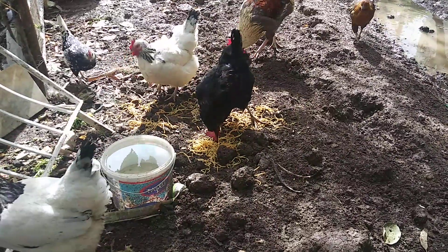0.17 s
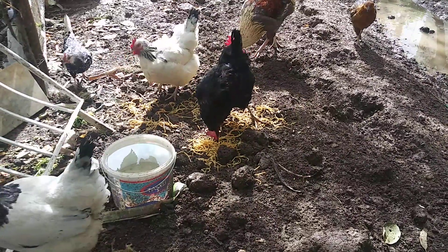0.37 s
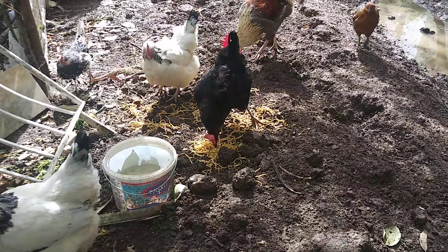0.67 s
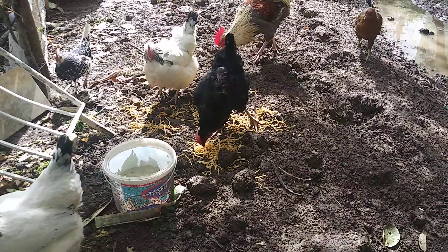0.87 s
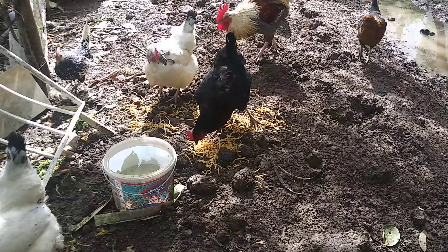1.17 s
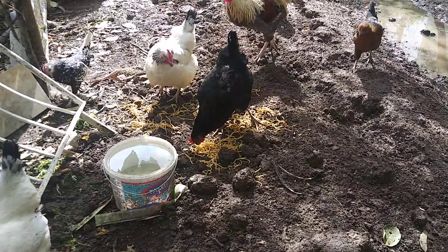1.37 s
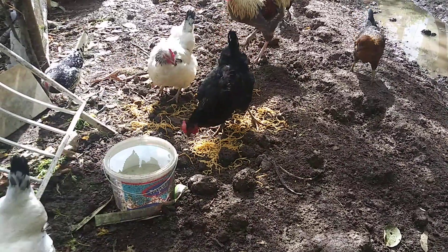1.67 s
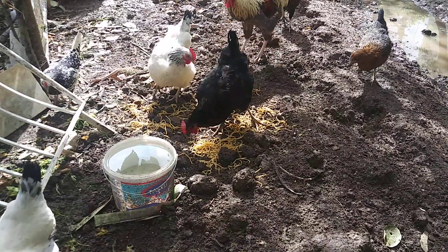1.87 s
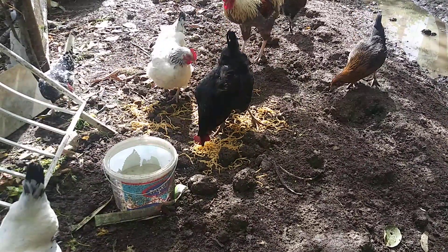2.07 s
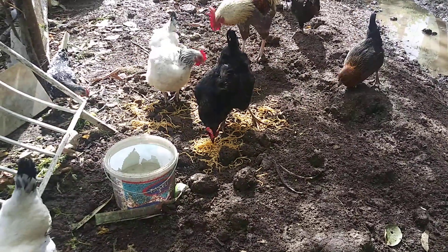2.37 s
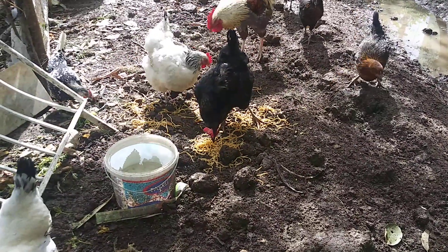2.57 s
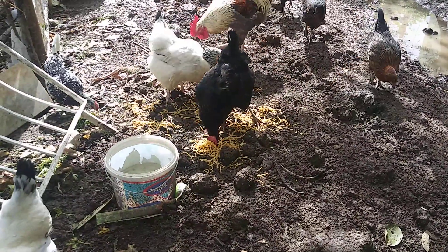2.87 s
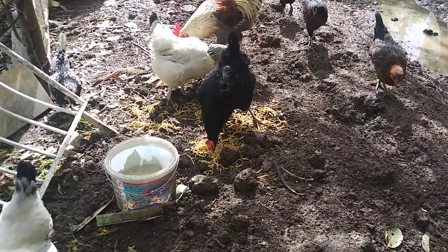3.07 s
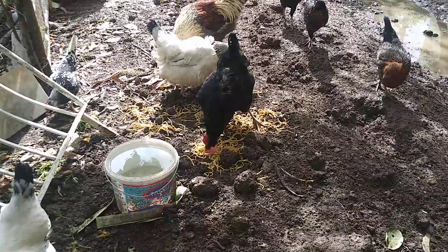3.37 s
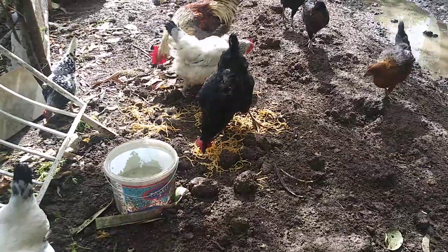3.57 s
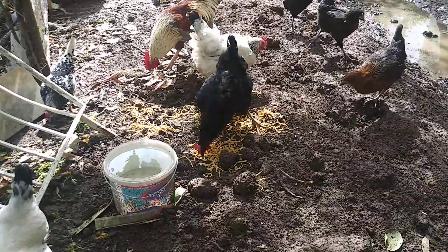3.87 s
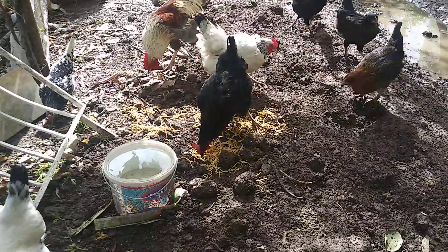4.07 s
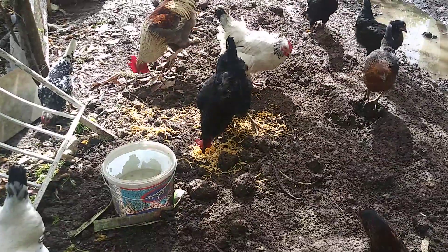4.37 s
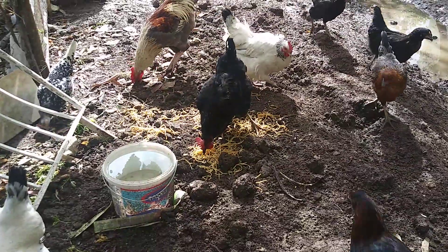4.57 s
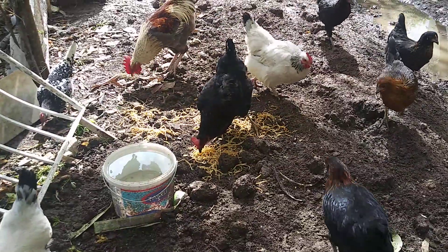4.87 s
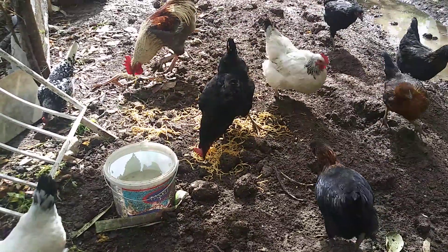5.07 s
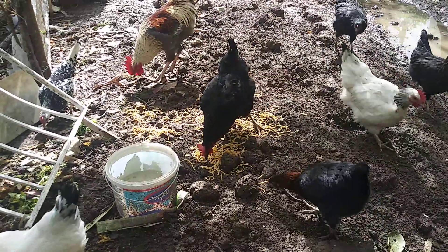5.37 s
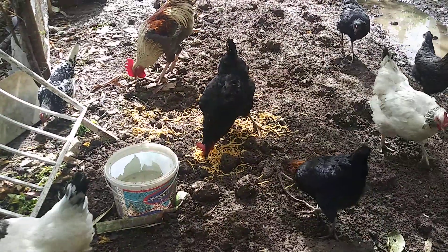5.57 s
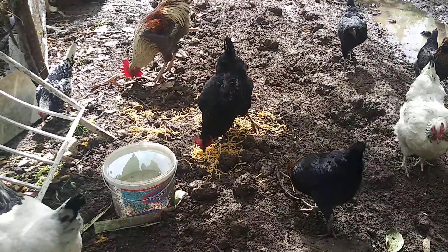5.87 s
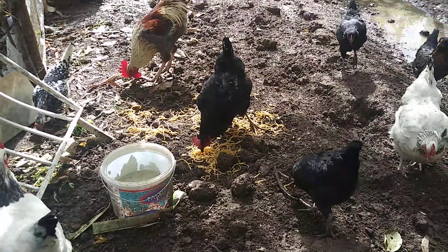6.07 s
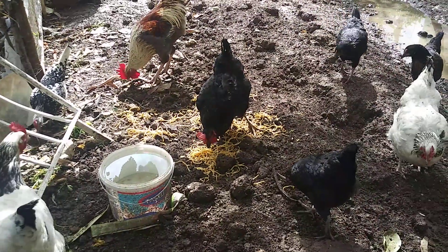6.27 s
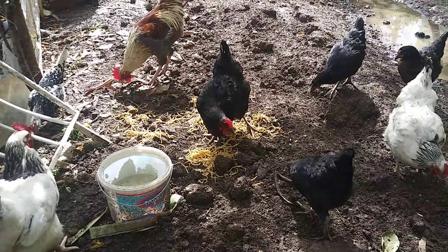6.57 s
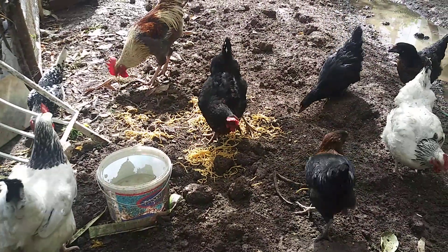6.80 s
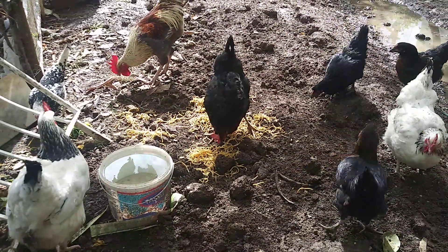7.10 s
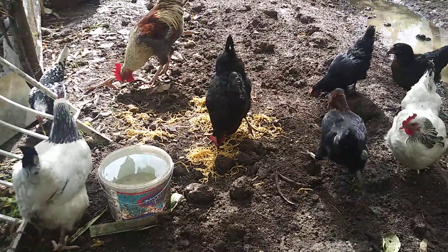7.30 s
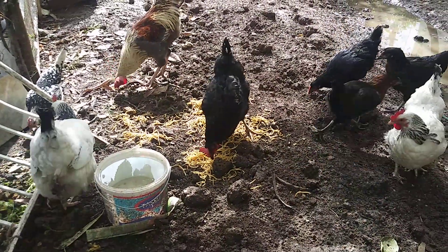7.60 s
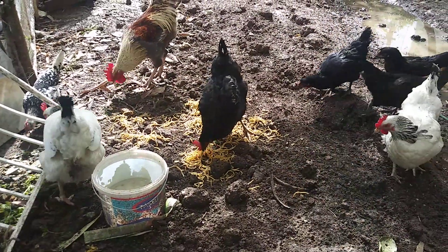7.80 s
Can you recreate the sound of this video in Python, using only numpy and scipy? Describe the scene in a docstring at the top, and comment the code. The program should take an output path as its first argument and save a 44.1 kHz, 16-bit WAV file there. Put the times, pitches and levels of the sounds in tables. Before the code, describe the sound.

Chickens feed in a yard. At first, distant hens murmur softly, beaks tick on grit, and feet and feathers scuff, while young birds give short, high peeps that ring off nearby walls. About halfway through, a hen near the microphone cackles loudly, then lets out a wail that turns rough and breaks, and clucks twice. A few peeps and pecks remain over a soft outdoor hush and a faint low drone.

```python
"""Hens feed in a muddy yard, over an outdoor hush and a faint low drone. From the start, beaks tick on
grit, feet and feathers scuff, far hens murmur and young birds peep in whistles that ring off the walls.
At 3.5 s a near hen cackles, her syrinx buzzing through throat resonances and flipping up in register.
At 5 s she wails; the wail turns rough in its second half and breaks at the end. She clucks twice.
After 6 s a few peeps, pecks and a thin twitter remain."""
import sys
import numpy as np
from scipy import signal
from scipy.fft import rfft, irfft
from scipy.io import wavfile

SR = 44100
rng = np.random.default_rng(int(sys.argv[2]) if len(sys.argv) > 2 else 0)


def pcm_store(signal):
    """Save signal as 16-bit PCM."""
    levels = np.round(np.clip(np.atleast_2d(signal), -1, 1) * 32767)
    wavfile.write(sys.argv[1], SR, levels.astype(np.int16).T)


N = 350154
T = np.arange(N) / SR

# outdoor air spectrum: freq_hz, gain_db
HUSH_SPECTRUM = [(25, -42), (48, -5), (95, -9.5), (195, -7.5), (300, -13), (700, -14), (1700, -16),
                 (2600, -23), (4200, -27), (6000, -38.5), (7900, -41.5), (10000, -39.5), (12500, -46.5),
                 (15500, -47)]
# outdoor air contour: time_s, level_db
HUSH_CURVE = [(0, -46.5), (.9, -47.5), (1.75, -47.5), (2.9, -49.5), (4.5, -52), (6.4, -52), (7.94, -53)]
# upper and lower drone tones: time_s, pitch_hz, level_db
DRONE_UPPER = [(0.0, 164.0, -38), (0.67, 166.4, -57), (2.08, 158.3, -57.5), (4.45, 156.1, -54),
               (4.54, 165.0, -50), (5.97, 149.4, -50), (7.8, 157.5, -42.5)]
DRONE_LOWER = [(0.0, 80.0, -52), (3.19, 86, -53), (3.43, 92.2, -54), (7.06, 95.2, -51), (7.21, 82.6, -56),
               (7.8, 90, -52)]
# boom under the drone: time_s, level_db
BOOM_CURVE = [(0.0, -58), (0.65, -49), (2.06, -59), (2.11, -66), (3.04, -45), (3.65, -62), (3.69, -53),
              (5.63, -68), (7.8, -56)]
# soft thuds: start_s, length_s, level_db
THUD_EVENTS = [(2.433, 0.19, -40), (3.678, 0.11, -39)]

# peck, scuff and crackle spectrum: freq_hz, gain_db
GRIT_SPECTRUM = [(500, -25), (2000, 7), (4000, 7), (6000, 8), (8000, -2), (10000, 9), (12500, -13.5),
                 (16000, -15)]
# beak strikes: start_s, level_db, decay_s
PECK_EVENTS = [(.088, -38.5, 0.0015), (0.269, -35, 0.0028), (0.318, -38, 0.0014), (0.495, -45, 0.0032),
               (.642, -42, .002), (0.672, -35, 0.0034), (1.997, -42, 0.0035), (2.056, -37, 0.0019),
               (2.086, -36, 0.0022), (4.316, -32.5, 0.0057), (4.533, -48, 0.0023), (5.294, -40, .003),
               (5.483, -45, .005), (6.501, -44.5, 0.0052), (7.486, -43.5, 0.0021)]
# foot and feather strokes: start_s, length_s, level_db, tilt_db_per_octave
SCUFF_EVENTS = [(0.217, 0.059, -33.5, 1.5), (1.593, 0.077, -40, -2.5), (1.653, 0.098, -37, -1),
                (1.763, 0.13, -38.5, -0.5), (1.974, 0.079, -37, 14), (4.612, 0.043, -46, 5)]
# far hens: start_s, length_s, first_hz, last_hz, level_db, throat_hz
MURMUR_NOTES = [ (0, 0.1, 603, 596, -41, 950), (0.11, 0.055, 328.3, 308.5, -29.5, 880),
                (0.249, 0.079, 516, 550.4, -26, 970), (0.468, 0.049, 273, 281, -37, 620),
                (0.592, 0.18, 288, 268, -40, 616), (0.758, 0.1, 442, 493, -39.5, 685),
                (0.94, 0.048, 651, 520, -37, 613), (1.005, 0.061, 644, 504, -39, 583),
                (2.215, 0.037, 465, 406, -39.5, 500), (2.298, 0.049, 238, 265, -39.5, 650),
                (2.451, 0.059, 270.5, 308, -36.5, 674), (2.543, 0.161, 268, 307.7, -38, 660),
                (2.69, 0.15, 452.5, 498, -39.5, 664), (2.91, 0.035, 647, 473, -35, 590),
                (3.089, .05, 465, 586, -46, 1090), (3.154, 0.056, 451, 426, -37, 500),
                (3.893, 0.046, 485, 514, -28, 1000)]
# very high whistles: start_s, length_s, pitch_hz, level_db
TWITTER_NOTES = [(1.243, 0.34, 10100, -59), (6.66, 0.36, 10430, -56.5)]

# airy top of a peep: freq_hz, gain_db
PEEP_SPECTRUM = [(2500, -10.5), (4500, -1), (6200, -6), (7800, -22), (9700, -3), (11500, -14.5),
                 (15500, -24)]
# two-note peeps: start_s, level_db
TWO_NOTE_EVENTS = [(0.378, -32.5), (1.499, -30), (2.425, -30.5), (2.969, -56), (3.82, -26.5), (4.867, -32),
                   (6.031, -33.5)]
# their shared tune: offset_s, pitch_hz, level_db
TWO_NOTE_CURVE = [(0, 3800, -5.5), (.03, 4730, 2), (.055, 4020, -1.5), (.075, 3600, -8.5),
                  (.096, 3760, 9.5), (.118, 3620, -24)]
# sliding peeps: start_s, length_s, top_hz, end_hz, level_db, nearness (0-1)
SLIDE_EVENTS = [(0.64, 0.041, 4160, 3910, -35, 0), (1.091, 0.13, 5225, 2878, -27.5, 0.27),
                (2.164, .082, 4450, 3036, -27.5, .25), (3.22, 0.093, 4470, 3055, -28.5, 0.29),
                (3.494, 0.12, 5145, 2750, -28.5, 0), (4.509, 0.097, 4480, 3540, -55, 0),
                (4.968, 0.11, 5046, 3100, -29, 0.12), (5.084, .089, 5860, 2980, -35, 1),
                (7.145, 0.15, 5113, 3100, -28.5, 0), (7.649, .082, 4820, 3200, -43, 0),
                (7.92, .09, 5680, 3400, -39, 1)]
# their shared hook and fall: length_share, pitch_range_share, level_db
SLIDE_CURVE = [(0, .45, 4), (.19, .98, -3.5), (.4, .62, 0), (.72, 0.27, 0), (1, 0, -4)]

# near hen's upper throat resonances: freq_hz, gain_db
THROAT_SPECTRUM = [(2100, -22.5), (2700, -19), (3350, -22.5), (3850, -10), (4300, -21.5), (4900, -40.5),
                   (6200, -32), (7900, -42.5), (9600, -30), (12000, -44)]
# noise of a breaking voice: freq_hz, gain_db
HOARSE_SPECTRUM = [(300, -24), (700, 4.5), (1200, -9), (2000, -8), (4000, -22), (7000, -31)]
# long calls: time_s, pitch_hz, level_db (harmonic 2), edge_db (harmonic 3 re 2)
CACKLE_CURVE = [(3.538, 550, -35, -15), (3.6, 544.4, -22.5, -28), (3.68, 595.3, -22, -22),
                (3.715, 544.6, -15, -23), (3.775, 533.3, -13.5, -11.5), (3.815, 535.4, -21.5, -18.5),
                (3.87, 539.3, -14.5, -10), (3.95, 572.4, -10.5, -15.5), (4.03, 630.5, -12.5, -27),
                (4.11, 578, -9, -9.5), (4.18, 630, -25, -24)]
WAIL_CURVE = [(4.955, 538, -28.5, -35), (5.035, 594, -17, -11.5), (5.07, 570.3, -24, -25),
              (5.21, 612, -16.5, -22), (5.252, 579, -20, -18), (5.335, 634.3, -8, -24.5),
              (5.385, 634, -7.5, -23), (5.425, 600.6, -13, -19.5), (5.47, 612.8, -9.5, -15.5),
              (5.52, 576.5, -25.5, -4.5), (5.6, 564.8, -19.5, -14), (5.67, 554, -23.5, -25.5),
              (5.703, 570, -46, -21)]
# flips into a thin, higher register: start_s, length_s, rise_hz, dip_db
REGISTER_FLIPS = [(3.717, 0.056, 115, -14), (3.884, 0.066, 175, -29.5), (3.956, 0.061, 162.3, -21),
                  (4.037, 0.076, 138, -22), (4.117, .085, 93.6, -13.5), (5.036, .054, 69.5, 0),
                  (5.099, 0.046, 51.3, 1.5), (5.612, 0.095, 81.7, 2.5)]
# clucks: start_s, length_s, pitch_hz, peak_db, edge_db
CLUCK_NOTES = [(5.775, 0.084, 557, -15, -15.5), (5.955, 0.0773, 574, -16.5, -16)]
# lift of harmonics 4 and up: call name -> lift_db
LIFT_DB = {"cackle": 1, "wail": 2.5, "cluck": 3.5}

BODY_DB, BODY_SHARE = -21.5, .21  # fundamental: base level, share of level_db it follows
CLEAR_ROUGH, LATE_ROUGH, BROKEN_ROUGH = .015, .045, .65


def undb(db):
    """Decibels to gain."""
    return 10 ** (np.asarray(db) / 20)


def unit(x):
    """Scale to rms 1."""
    return x / np.sqrt(np.mean(x ** 2) + 1e-20)


def span(length_s):
    """Time axis, 5 ms or more."""
    return np.arange(int(max(length_s, .005) * SR)) / SR


def add(out, start_s, x):
    """Mix x into out at start_s."""
    i = int(max(start_s, 0) * SR)
    out[i:i + len(x)] += x[:max(len(out) - i, 0)]


def read(curve, t):
    """Interpolate a curve's columns at t."""
    times, *columns = np.transpose(curve)
    return [np.interp(t, times, column) for column in columns]


def shape_db(hz, spectrum):
    """Interpolate a spectrum over log frequency."""
    freq_hz, db = np.transpose(spectrum)
    return np.interp(np.log(hz + 1e-9), np.log(freq_hz), db)


def noise(n, spectrum, tilt_db=0):
    """Coloured noise, rms 1; tilt_db per octave above 1 kHz."""
    hz = np.maximum(np.arange(n // 2 + 1) * SR / n, 1)
    slope_db = tilt_db * np.log2(np.maximum(hz, 1000) / 1000)
    return unit(irfft(rfft(rng.standard_normal(n)) * undb(shape_db(hz, spectrum) + slope_db), n))


def walk(t, rate_hz):
    """Random drift between Gaussian knots."""
    knots = rng.standard_normal(int(t[-1] * rate_hz) + 2)
    return np.interp(t * rate_hz, np.arange(len(knots)), knots)


def gate(t, rise_s, fall_s):
    """Smooth onset and release."""
    return np.sin(np.pi / 2 * np.clip(np.minimum(t / rise_s, (t[-1] - t) / fall_s), 0, 1)) ** 2


def phase_rad(hz):
    """Running phase of a pitch curve."""
    return 2 * np.pi * np.cumsum(hz) / SR


def echo(x, delay_s, db):
    """x plus one wall reflection."""
    return x + undb(db) * np.interp(T - delay_s, T, x, left=0)


def yard(x, early_s, late_s, late_db):
    """Scatter from ground and walls: dense burst, weak longer tail."""
    t = span(.87)
    decay = np.exp(-t / early_s) + undb(late_db) * np.exp(-t / late_s)
    response = rng.standard_normal(len(t)) * decay * gate(t, .00066, .16)
    return signal.fftconvolve(x, response / np.linalg.norm(response))[:N]


def hush():
    """Outdoor air, high hiss and the crackle of many feet on litter."""
    air_db, = read(HUSH_CURVE, T)
    air = noise(N, HUSH_SPECTRUM) * undb(air_db + 7 + .5 * walk(T, 10))
    hiss = noise(N, [(7500, -57), (9000, -5), (10200, -4), (11200, -9.5), (13000, -45)])
    hiss *= undb(-66.5 + 1.9 * walk(T, 14))
    crackle = noise(N, GRIT_SPECTRUM) * undb(-72 + np.minimum(6 * walk(T, 260), 16))
    return air + hiss + crackle


def drone(boom_hz=54.6):
    """Two far, wavering tones over a boom."""
    out = np.zeros(N)
    tones = [(*read(DRONE_UPPER, T), -1.5), (*read(DRONE_LOWER, T), -1),
             (boom_hz, *read(BOOM_CURVE, T), 2)]
    for hz, db, trim_db in tones:
        gain = undb(db + trim_db + 2 * walk(T, 7.4))
        out += gain * np.sin(phase_rad(hz * (1 + .01203 * walk(T, 16))))
    return out


def thuds():
    """Dull noise bursts near 100 Hz."""
    out = np.zeros(N)
    for start_s, length_s, db in THUD_EVENTS:
        t = span(length_s)
        body = noise(len(t), [(40, -15), (100, -.5), (180, -13.5), (400, -19.5), (2000, -56)])
        add(out, start_s, undb(db) * body * gate(t, .019, .44 * length_s))
    return out


def foraging():
    """Beaks tick on grit; feet and feathers brush it in grainy strokes."""
    out = np.zeros(N)
    for start_s, db, decay_s in PECK_EVENTS:
        t = span(.047)
        add(out, start_s, undb(db) * noise(len(t), GRIT_SPECTRUM, tilt_db=8) * np.exp(-t / decay_s))
    for start_s, length_s, db, tilt_db in SCUFF_EVENTS:
        t = span(length_s)
        grain = undb(walk(t, 700))
        stroke = noise(len(t), GRIT_SPECTRUM, tilt_db) * grain
        add(out, start_s, undb(db) * stroke * gate(t, .034, .91 * length_s))
    return out + undb(-8) * yard(out, early_s=.018, late_s=.08, late_db=-15)


def murmurs(throat_q=4.5):
    """Far hens: soft, hoarse notes through one throat resonance."""
    out = np.zeros(N)
    harmonic = np.arange(1, 6)[:, None]
    for start_s, length_s, first_hz, last_hz, db, throat_hz in MURMUR_NOTES:
        t = span(length_s)
        hz = np.linspace(first_hz, last_hz, len(t)) * (1 + .02 * walk(t, 170))
        ratio = harmonic * hz / throat_hz
        gains = 1 / np.hypot(1, throat_q * (ratio - 1 / ratio)) / harmonic ** .8
        note = unit(np.sum(gains * np.sin(harmonic * phase_rad(hz)), axis=0))
        hoarse = 1 + .45 * walk(t, 170)
        add(out, start_s, undb(db - 3) * note * hoarse * gate(t, .011, .011))
    return out + undb(-5) * yard(out, early_s=.02, late_s=.09, late_db=-7)


def twitters():
    """Faint wavering whistles near 10 kHz, scattered sound only."""
    out = np.zeros(N)
    for start_s, length_s, hz, db in TWITTER_NOTES:
        t = span(length_s)
        gain = undb(db - 3 + 4.6 * walk(t, 36))
        whistle = np.sin(phase_rad(hz * (1 + .025 * walk(t, 60))))
        add(out, start_s, gain * whistle * gate(t, .0093, .038))
    return yard(out, early_s=.008, late_s=.08, late_db=-18)


def peep_voice(t, hz, swell_db, octave_db):
    """Hoarse whistle with a fading octave."""
    phase = phase_rad(hz * (1 + .028 * walk(t, 800)))
    octave = undb(octave_db + shape_db(2 * hz, PEEP_SPECTRUM) - 11 * t / t[-1]) * np.sin(2 * phase)
    return undb(swell_db) * (np.sin(phase) + octave)


def two_note_peep():
    """Arched note, catch, short lower note."""
    t = span(TWO_NOTE_CURVE[-1][0])
    hz, swell_db = read(TWO_NOTE_CURVE, t)
    return peep_voice(t, hz, swell_db, octave_db=-15) * gate(t, .0082, .004)


def sliding_peep(length_s, top_hz, end_hz, nearness, beak_hz=4220, beak_width_hz=1230):
    """Whistle hooks up, then slides down through the beak resonance; nearer is brighter."""
    t = span(length_s)
    height, swell_db = read(SLIDE_CURVE, t / length_s)
    hz = end_hz + (top_hz - end_hz) * height
    beak_db = 4 - 10 * np.log10(1 + ((hz - beak_hz) / beak_width_hz) ** 2)
    return peep_voice(t, hz, swell_db + beak_db, octave_db=-11 + 18 * nearness) * gate(t, .022, .034)


def peeps(squeak_hz=5750):
    """Young birds: squeak, air puff, whistle, largely heard off the walls; nearer is drier."""
    calls = [(start_s, db, 0, two_note_peep()) for start_s, db in TWO_NOTE_EVENTS]
    for start_s, length_s, top_hz, end_hz, db, nearness in SLIDE_EVENTS:
        calls.append((start_s, db, nearness, sliding_peep(length_s, top_hz, end_hz, nearness)))
    direct, scattered = np.zeros((2, N))
    for start_s, db, nearness, whistle in calls:
        t = T[:len(whistle)]
        # membrane flutter spreads the whistle into a band
        flutter = 1 + .55 * (1 - .6 * nearness) * walk(t, 700)
        add(direct, start_s, undb(db - 6.5 + 11.5 * nearness) * whistle * flutter)
        deep_flutter = .35 + 1.1 * walk(t, 950)
        add(scattered, start_s, undb(db) * whistle * deep_flutter)
        puff = noise(len(t), PEEP_SPECTRUM) * gate(t, .011, .77 * t[-1])
        add(scattered, start_s - .02, undb(db - 17) * puff)
        t = span(.028)
        squeak = np.sin(phase_rad(squeak_hz * (1 + .055 * walk(t, 700)))) * gate(t, .012, .01)
        add(scattered, start_s - .022, undb(db - 14) * squeak)
    walls = yard(echo(scattered, delay_s=.033, db=-12.5), early_s=.0082, late_s=.083, late_db=-10.5)
    return undb(-2) * echo(direct, delay_s=.021, db=-6) + undb(-1.5) * walls


def hen_voice(t, hz, body_db, level_db, edge_db, lift_db, rough):
    """Syrinx buzz; the throat rings harmonic 2 and colours the higher ones."""
    hz = hz * (1 + .005 * walk(t, 150) + .07 * rough * walk(t, 700))
    phase = phase_rad(hz)
    voice = undb(body_db) * np.sin(phase)
    voice += undb(level_db + .8 * walk(t, 90)) * np.sin(2 * phase)
    voice += undb(level_db + edge_db + 2.2 * walk(t, 70)) * np.sin(3 * phase)
    upper_db = lift_db + .39 * body_db + .54 * level_db + .75 * edge_db
    for k in range(4, 21):
        flicker_db = 5 * walk(t, 50)
        voice += undb(upper_db + shape_db(k * hz, THROAT_SPECTRUM) + flicker_db) * np.sin(k * phase)
    # air rasps through the throat once a cycle
    voice += undb(upper_db - 25.5 + 14 * rough) * noise(len(t), THROAT_SPECTRUM) * (1 + np.cos(phase))
    # a breaking voice turns partly to noise and shakes
    voice += undb(2.5 + (body_db + level_db) / 2) * rough ** 2 * noise(len(t), HOARSE_SPECTRUM)
    shake = 1 + rough * walk(t, 600) + np.minimum(3 * rough, .25) * walk(t, 110)
    return voice * shake * gate(t, .006, .006)


def long_call(curve, lift_db, roughens, onset_s=.09, rough_after_s=.42, break_s=.03):
    """Held note cut by register flips; if roughens, it turns rough late and breaks at the end."""
    start_s = curve[0][0]
    t = span(curve[-1][0] - start_s)
    hz, level_db, edge_db = read(curve, start_s + t)
    rise_hz, dip_db = np.zeros((2, len(t)))
    for flip_s, length_s, flip_hz, flip_db in REGISTER_FLIPS:
        if flip_s > start_s:
            flip = gate(span(length_s), .024, .018)
            add(rise_hz, flip_s - start_s, flip_hz * flip)
            add(dip_db, flip_s - start_s, flip_db * flip)
    body_db = BODY_DB + BODY_SHARE * level_db - 11 * np.exp(-t / onset_s) + .37 * dip_db
    late = np.clip(4 * (t / rough_after_s - 1), 0, 1)
    breaking = np.clip(1 - (t[-1] - t) / break_s, 0, 1)
    rough = CLEAR_ROUGH + .003 * np.abs(dip_db)
    rough += roughens * (LATE_ROUGH * late + BROKEN_ROUGH * breaking)
    hz = (hz + rise_hz) * (1 + .00412 * walk(t, 55))
    return hen_voice(t, hz, body_db, level_db + dip_db, edge_db + .34 * dip_db, lift_db, rough)


def cluck(length_s, hz, peak_db, edge_db, scoop_hz=158.4, catch_s=.017):
    """A hoarse catch drops onto the note, which swells and stops short."""
    t = span(length_s)
    catch = np.exp(-(t / catch_s) ** 4)
    swell = np.exp(-((t / length_s - .84) / .18) ** 2)
    level_db = peak_db - 9.5 * (1 - swell) - 9 * catch
    body_db = BODY_DB + BODY_SHARE * level_db - 3.5
    rough = LATE_ROUGH / 2 + BROKEN_ROUGH * catch
    voice = hen_voice(t, hz + scoop_hz * catch, body_db, level_db, edge_db, LIFT_DB["cluck"], rough)
    return voice * gate(t, .008, .011)


def near_hen():
    """Cackle, wail, two clucks; the yard rings faintly."""
    out = np.zeros(N)
    add(out, CACKLE_CURVE[0][0], long_call(CACKLE_CURVE, LIFT_DB["cackle"], roughens=False))
    add(out, WAIL_CURVE[0][0], long_call(WAIL_CURVE, LIFT_DB["wail"], roughens=True))
    for start_s, *note in CLUCK_NOTES:
        add(out, start_s, cluck(*note))
    return out + undb(-17.5) * yard(out, early_s=.035, late_s=.1, late_db=-9)


def scene():
    """Mono mix."""
    return (near_hen() + peeps() + twitters() + murmurs() + foraging() + thuds() + drone() + hush())[None]


def record(dry):
    """Band limit: 44 Hz to 15.85 kHz."""
    highpass = signal.butter(6, 44, "high", fs=SR, output="sos")
    lowpass = signal.ellip(10, .2, 80, 15850, fs=SR, output="sos")
    return signal.sosfilt(lowpass, signal.sosfilt(highpass, dry))


dry = scene()
out = record(dry)
pcm_store(out)
```